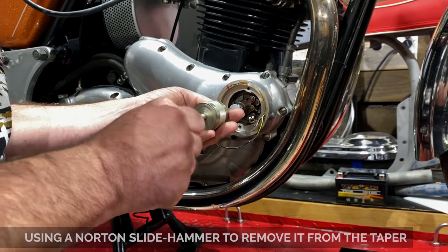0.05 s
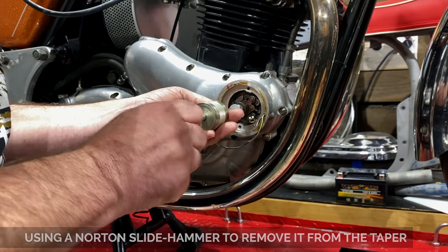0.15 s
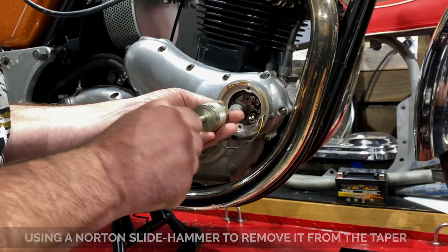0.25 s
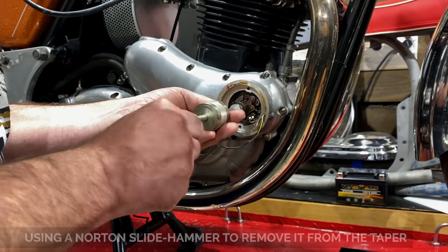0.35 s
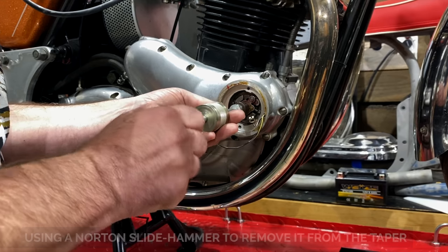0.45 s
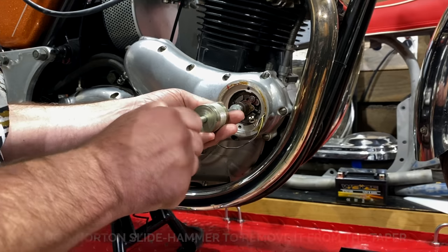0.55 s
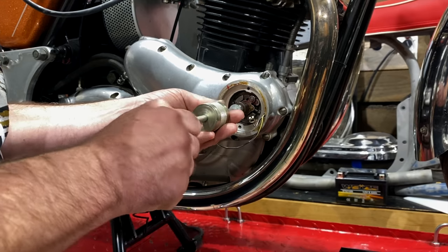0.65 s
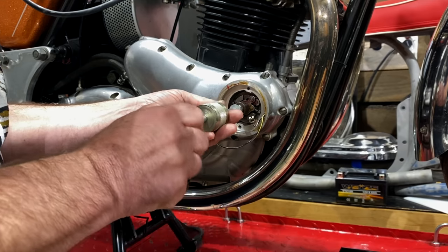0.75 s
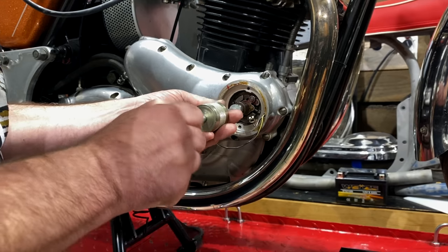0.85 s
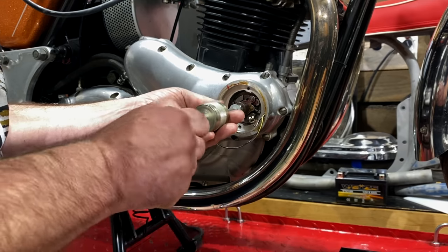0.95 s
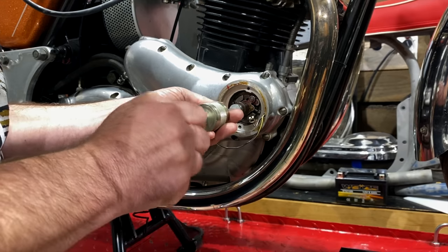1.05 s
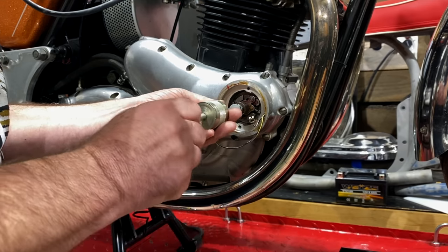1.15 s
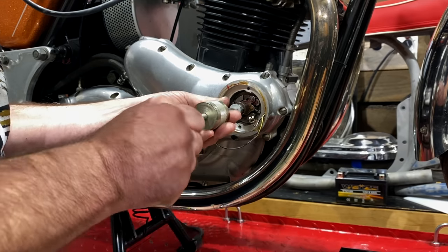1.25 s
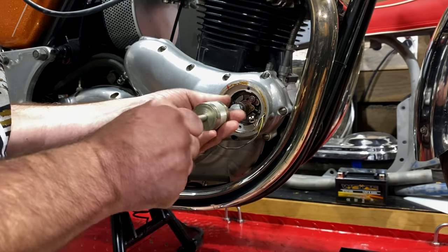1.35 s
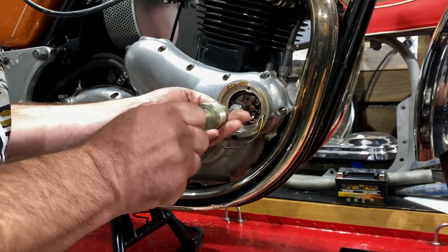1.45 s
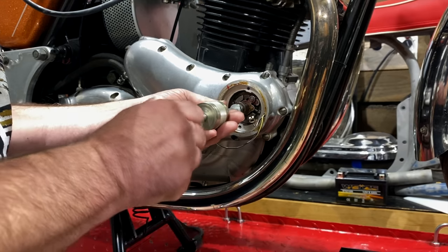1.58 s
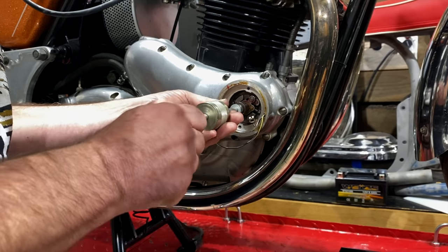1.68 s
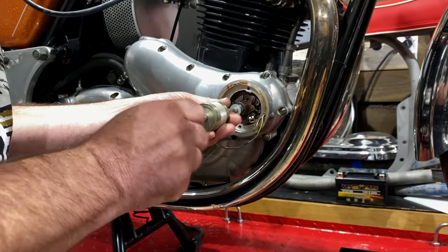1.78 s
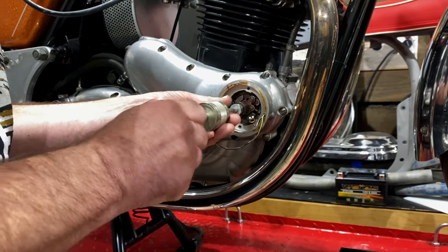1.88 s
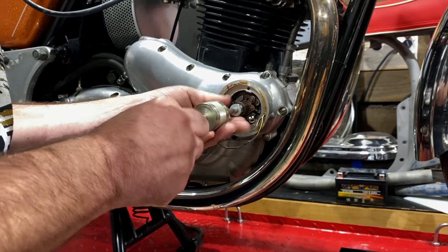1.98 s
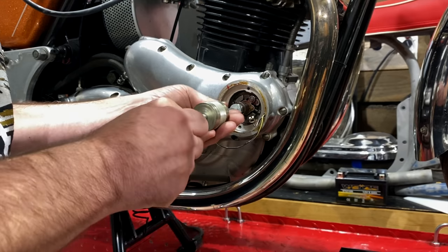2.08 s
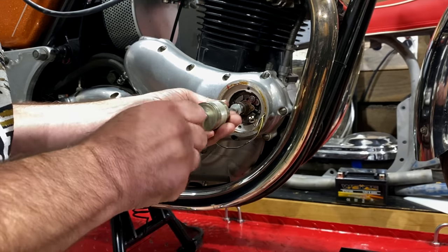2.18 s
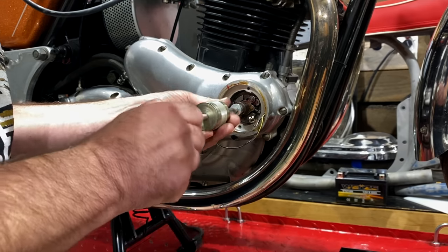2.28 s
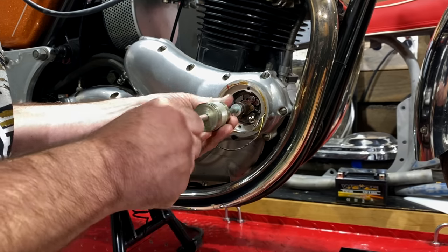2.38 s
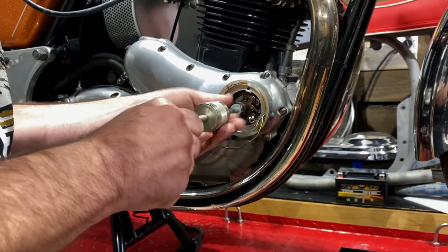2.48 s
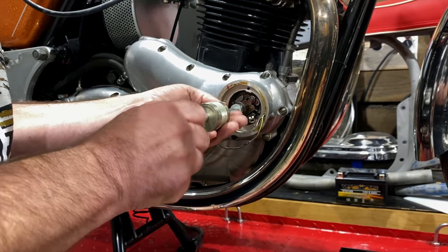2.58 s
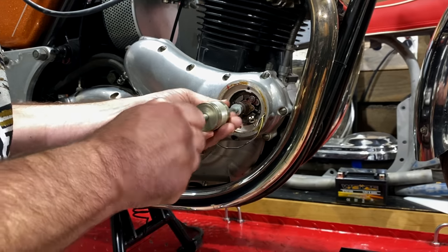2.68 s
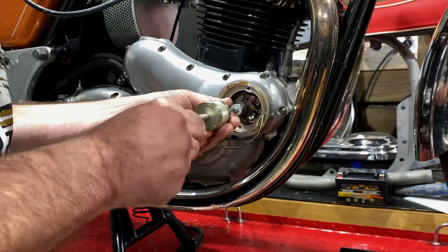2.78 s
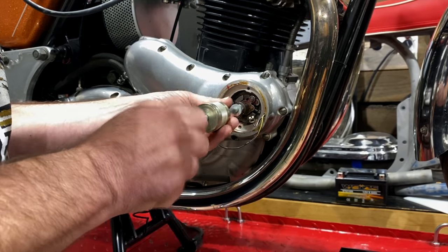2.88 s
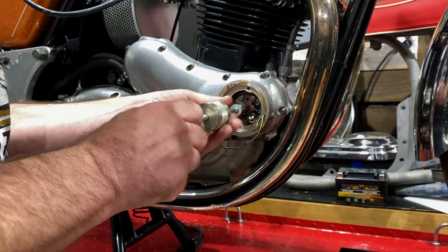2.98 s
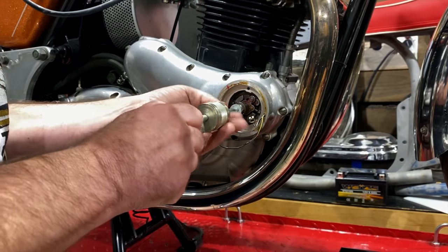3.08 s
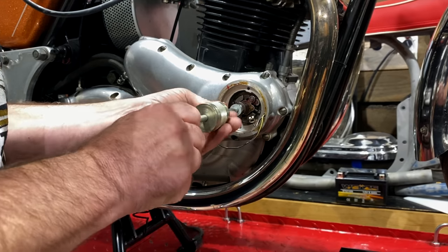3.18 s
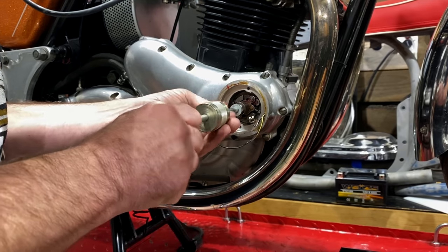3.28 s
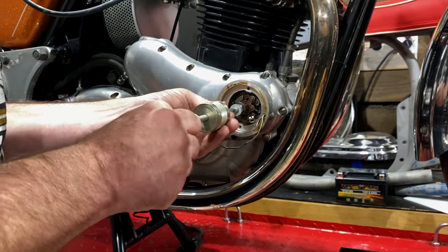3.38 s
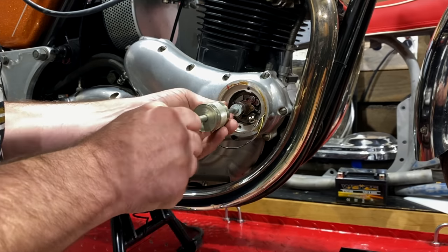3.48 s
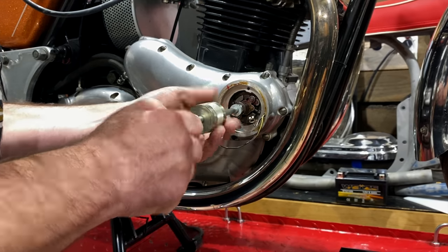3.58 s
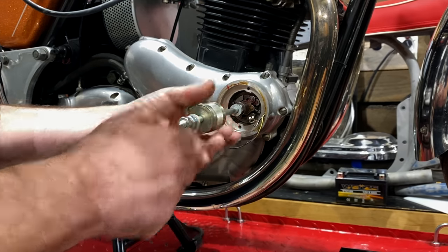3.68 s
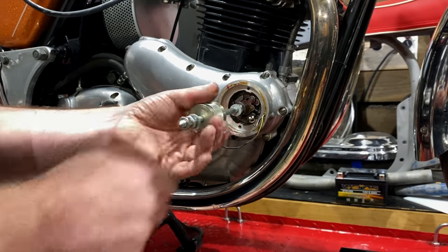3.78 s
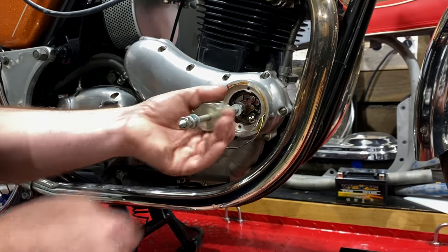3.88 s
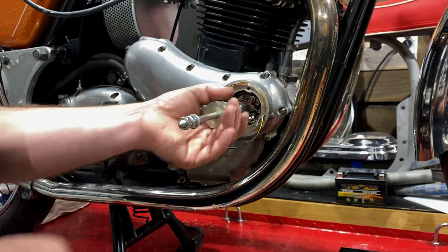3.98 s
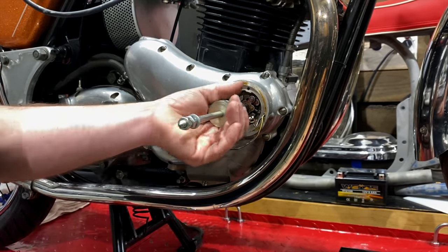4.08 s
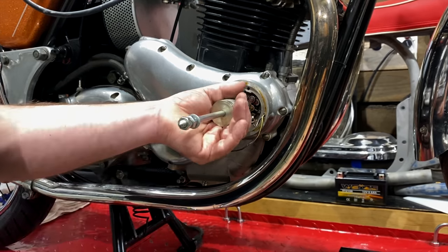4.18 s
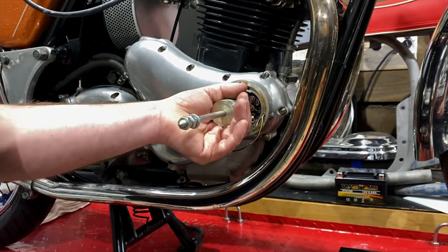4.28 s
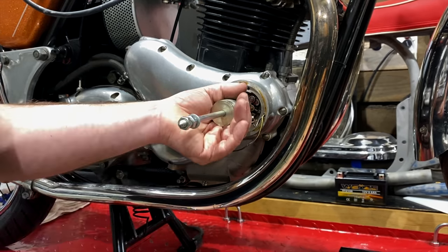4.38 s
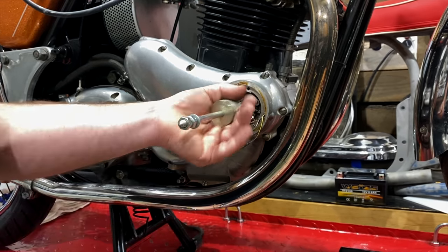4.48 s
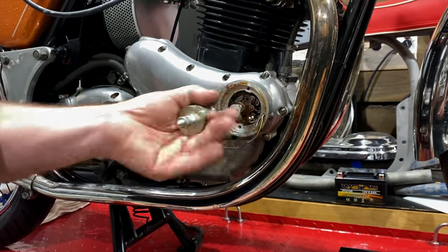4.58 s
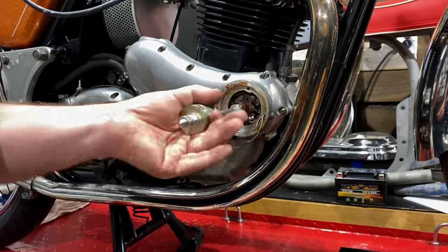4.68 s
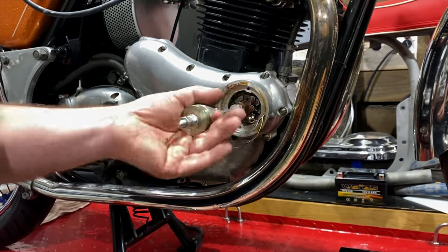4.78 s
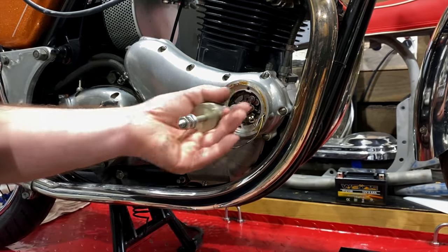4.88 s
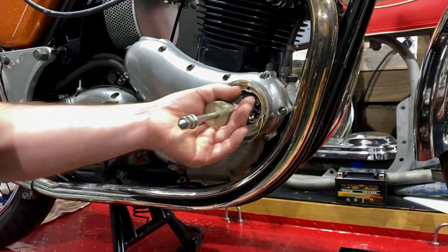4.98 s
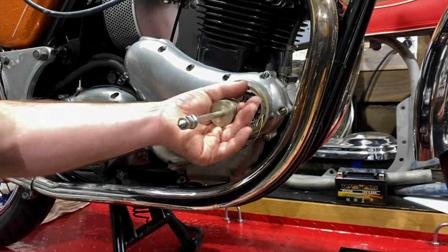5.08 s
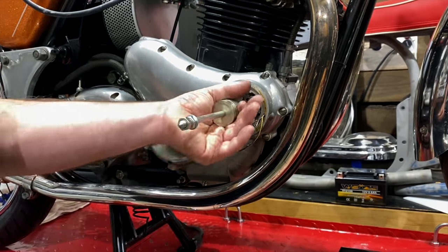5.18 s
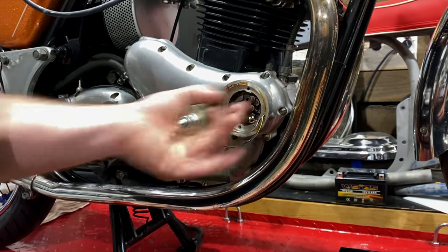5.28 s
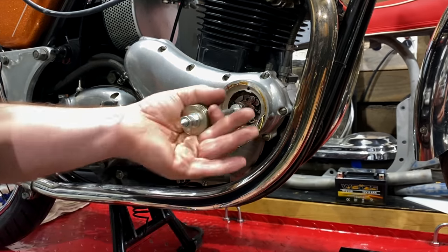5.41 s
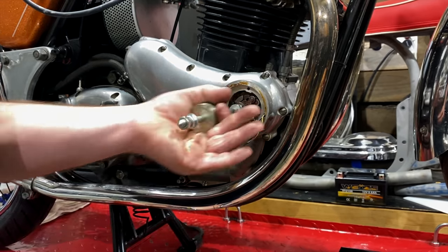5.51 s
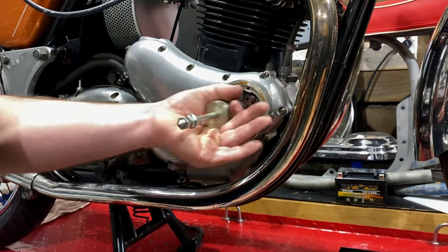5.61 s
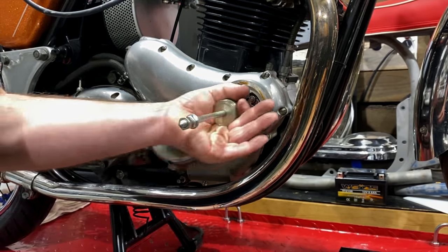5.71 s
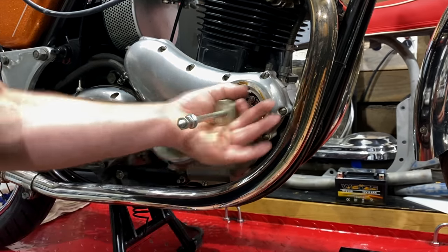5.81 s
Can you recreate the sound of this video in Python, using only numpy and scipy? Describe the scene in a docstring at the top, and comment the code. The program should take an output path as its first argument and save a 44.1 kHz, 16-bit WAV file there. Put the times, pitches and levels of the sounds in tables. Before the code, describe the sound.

A quiet workshop with low uneven rumble, faint mains hum and little hiss, in close stereo. From 0 to about 4 seconds a steel slide hammer is screwed into an engine part: irregular light clinks and ticks, several per second, each a tiny chatter with a short bright rod ring, among faint gritty thread scrapes. Contacts are somewhat firmer from 3 seconds. Around 4.3 to 4.7 the weight rubs more audibly along its rod, with a barely audible low moan. At 4.98 a scrape swells quickly into a very loud steel crack at 5.06, with a high whistle, engine-case ringing and a diffuse room tail. Scraping fades as the weight slides back from 5.16 to 5.65, with small clinks and two dull, soft brushes near 5.4 and 5.7. Another short rising scrape leads to a second, equally hard, drier slam at 5.78, its ringing cut off by the end.

```python
"""Slide hammer in a workshop

A slide hammer is screwed into an engine part: light chattering contacts clink and set its rod ringing,
amid thread scrapes of uneven noise. Twice the weight scrapes along the rod and slams into the stop: a noise
crack wakes ringing modes of the engine case and a diffuse room tail. A faint moan and two dull brushes join in.
Mains hum (sines) and a low rumble (filtered noise) lie underneath; the loudest peaks overload the recorder.
"""
import sys
import numpy as np
from scipy import signal
from scipy.fft import rfft, irfft
from scipy.io import wavfile
from scipy.ndimage import uniform_filter1d

SR = 44100
rng = np.random.default_rng(int(sys.argv[2]) if len(sys.argv) > 2 else 0)


def wav_record(signal):
    """Record a signal, one row per channel, as 16-bit PCM in the file named by sys.argv[1]."""
    frames = np.transpose(np.atleast_2d(signal))
    bounded = np.clip(frames, -1, 1)
    # unit amplitude maps onto the largest positive 16-bit level
    quanta = np.round(bounded * 32767).astype(np.int16)
    wavfile.write(sys.argv[1], SR, quanta)


N = 257984  # length in samples


def undb(db):
    """Decibels to gain."""
    return 10 ** (np.asarray(db) / 20)


def unit(x):
    """Scale to rms 1."""
    return x / np.sqrt(np.mean(x ** 2))


def over_hz(table, hz):
    """Read a table of (f/Hz, value) on a log frequency axis."""
    f, value = np.transpose(table)
    return np.interp(np.log(np.maximum(hz, 1)), np.log(f), value)


def colour(x, table):
    """Filter by a (f/Hz, level/dB) spectrum through a causal, minimum-phase response with energy 1."""
    log_gain = over_hz(table, np.linspace(0, SR / 2, 1025)) * np.log(10) / 20
    cepstrum = irfft(log_gain)
    # folding the cepstrum forward in time makes the response causal
    cepstrum[1:1024] *= 2
    cepstrum[1025:] = 0
    h = irfft(np.exp(rfft(cepstrum)))
    h = np.reshape(h / np.linalg.norm(h), (1,) * (x.ndim - 1) + (-1,))
    return signal.fftconvolve(x, h, axes=-1)[..., :x.shape[-1]]


def three(x, low_hz, high_hz):
    """Split into low, middle and treble with crossfades a third of an octave wide."""
    spec, f = rfft(x), np.linspace(1, SR / 2, N // 2 + 1)
    above_low, above_high = (np.clip(.5 + 3 * np.log2(f / hz), 0, 1) for hz in (low_hz, high_hz))
    return [irfft(spec * part, N) for part in (1 - above_low, above_low - above_high, above_high)]


# how alike the two ports sound: (f/Hz, left-right correlation)
PORT_LIKENESS = [(60, 0.78), (300, 0.6), (700, 0.12), (3000, 0.16), (8000, 0.043)]


def stereo(size):
    """White noise at two ports, most alike in the bass: shared and opposed noise mixed per frequency."""
    mid, side = rfft(rng.standard_normal((2, size)))
    alike = np.clip(over_hz(PORT_LIKENESS, np.linspace(0, SR / 2, len(mid))), 0, 1)
    shared, opposed = mid * np.sqrt(1 + alike), side * np.sqrt(1 - alike)
    return irfft([shared + opposed, shared - opposed], size) / np.sqrt(2)


def walk(rate):
    """Random levels held 1 / rate s and slewed twice; rms 1."""
    hold = int(SR / rate)
    steps = np.repeat(rng.standard_normal(N // hold + 1), hold)
    return unit(uniform_filter1d(uniform_filter1d(steps, hold), hold)[:N])


def curve(rows, hold_s=.008):
    """Columns of a table over time, and a soft gate for its span plus a short hold."""
    s, *columns = np.transpose(rows)
    t = np.arange(N) / SR
    gate = uniform_filter1d(1. * ((t > s[0]) & (t < s[-1] + hold_s)), 100)
    return gate, [np.interp(t, s, column) for column in columns]


def bursts(times, gains, taus, rise):
    """Sum of envelopes that swell to their gain and decay; the swell lasts a share of the decay."""
    env, t = np.zeros(N), np.arange(4000) / SR
    for s, gain, tau in zip(times, gains, np.maximum(taus, 3e-4)):
        start = int(s * SR)
        shape = (1 - np.exp(-t / (rise * tau))) ** 2 * np.exp(-t / tau)
        env[start:start + len(t)] += (gain * shape / shape.max())[:N - start]
    return env


def kicks(times, gains, scatter_db):
    """An impulse at each contact, of random phase and, with scatter, uneven size."""
    force, chance = np.zeros(N, complex), rng.standard_normal((len(times), 2))
    at = (np.asarray(times) * SR).astype(int)
    force[at] = gains * undb(scatter_db * chance[:, 0]) * np.exp(3j * chance[:, 1])
    return force


def ring(force, modes, flutter_db=2.0):
    """Decaying modes driven by a force; the right port hears each mode at another phase."""
    out = np.zeros((2, N))
    for hz, db, t60 in modes:
        pole = np.exp(2j * np.pi * hz / SR - np.log(1000) / (t60 * SR))
        z = signal.lfilter([1], [1, -pole], force(hz))
        turn = np.exp(1j * rng.normal(0, min(hz / 1500, 1.5)))
        # loose parts make each ring flutter
        out += undb(db + flutter_db * walk(70)) * np.imag([z, z * turn])
    return out


# reverberation of the room: (f/Hz, t60/s)
ROOM_DECAY = [(125, 0.7), (500, 0.75), (1500, 0.35), (4000, 0.33), (8000, 0.17), (14000, 0.44)]


def room(x, rise_s=0.00043):
    """Diffuse tail: octave bands of noise, each dying at its own rate."""
    t = np.arange(SR) / SR
    spec, f, h = rfft(stereo(SR)), np.linspace(1, SR / 2, SR // 2 + 1), 0
    for hz in 62.5 * 2. ** np.arange(9):
        band = irfft(spec * np.clip(1 - np.abs(np.log2(f / hz)), 0, 1), SR)
        h = h + band * undb(-60 * t / over_hz(ROOM_DECAY, hz))
    h = h * (1 - np.exp(-t / rise_s))
    return signal.fftconvolve(x[None], h / np.linalg.norm(h[0]), axes=-1)[:, :N]


# spectrum of the workshop air: (f/Hz, relative level/dB)
SHOP_SPECTRUM = [(15, -34.5), (25, -17), (74, 4), (309, -18), (666, -22.5), (1160, -26.5), (1600, -35),
                 (1920, -32.5), (2440, -34), (6850, -35.5), (8470, -50), (9920, -38), (11600, -49),
                 (14000, -72)]
# uneven drift in the level of the low rumble, played relative to its mean: (t/s, level/dB)
RUMBLE_DRIFT = [(0.0, -52.5), (1.25, -59), (1.32, -53.5), (1.83, -57), (2.09, -50), (2.26, -56.5),
                (3.6, -53.5), (3.73, -52), (3.94, -57.5), (4.09, -45.5), (4.15, -58.5), (4.25, -51.5),
                (4.94, -56.5), (5.05, -54.5)]
# mains hum partials before the drift: (f/Hz, level/dB)
HUM_PARTIALS = [(59.5, -63), (119, -64), (178.5, -72), (238, -73)]
SHOP_DB = -57  # rms of rumble and hiss before the port balance


def shop():
    """Rumble of uneven, drifting level, faint hiss above it, and wavering mains hum that follows the drift."""
    low, mid, high = three(colour(stereo(N), SHOP_SPECTRUM), low_hz=198, high_hz=1000)
    drift_db = curve(RUMBLE_DRIFT)[1][0]
    drift = undb(drift_db - np.mean(drift_db))
    air = unit(drift * low + mid + high) * undb(SHOP_DB)
    t = np.arange(N) / SR
    hum = sum(undb(db + 2 * walk(1.2)) * np.sin(2 * np.pi * hz * t) for hz, db in HUM_PARTIALS)
    return (air + drift * hum) * undb([[-.8], [.8]])  # right port louder


# clinks of weight and thread; the shares are 0 for a usual clink:
# (t/s, level/dB, depth share/dB, brightness share/dB, contact chatter/s, main ring share near 1.6 kHz/dB)
CLINK_CONTACTS = [(0.0034, -48.5, 4.5, 6.5, 0.003, 2), (0.012, -47, 4.5, 0.5, 0.0032, 4.5),
                  (0.2574, -68, -8, -8, 0.0028, -4), (0.3278, -63, 7, -29, 0.006, 10),
                  (0.391, -52.5, 10, -6, 0.008, 8), (0.4127, -59.5, 4, -29, 0.0062, 6),
                  (0.434, -52, -13, -4, 0.0032, 6.5), (0.5012, -58.5, -17, 5.5, 0.0032, -3),
                  (0.549, -66.5, -3, 13, 0.0038, -2), (0.5702, -56, -13, 10, 0.003, -4),
                  (0.597, -78, 5, 28, 0.0058, -4), (0.7199, -55, 5, -1, 0.0089, 7),
                  (0.8999, -59, -5, -1, 0.005, -2), (0.9572, -61, 8.5, -10, 0.0065, 6),
                  (1.0012, -45, 2, -12, 0.0029, 0), (1.059, -48, -2, 18, 0.003, -3.5),
                  (1.0977, -65, 15, 22, 0.0029, 2), (1.2017, -60, -2, -9, 0.0034, -5),
                  (1.269, -48.5, 3, -8, 0.0032, -1), (1.3691, -52, 2, -19, 0.0057, -0.5),
                  (1.4399, -55.5, 6, -19, 0.0081, 4), (1.498, -59.5, 6, 6.5, 0.003, -3.5),
                  (1.5461, -58, 7, 16, 0.0034, -1), (1.59, -58.5, -3, 10, 0.0033, 0),
                  (1.633, -48.5, 1, -20, 0.0031, 0), (1.6794, -61, 9, 8, 0.0029, 0),
                  (1.708, -53.5, 7.5, 4.5, 0.0055, 4), (1.922, -51, 7.5, -8, 0.0069, -1),
                  (2.0035, -47.5, 3, -11, 0.0032, 0.5), (2.0488, -51.5, -1, 11, 0.0033, -0.5),
                  (2.1958, -59.5, -2, 14.5, 0.0027, -3), (2.2208, -55.5, 0.5, 15.5, 0.0028, -2),
                  (2.2607, -58.5, -2, 17.5, 0.0031, -5), (2.2873, -62.5, -18, 18.5, 0.0034, -9),
                  (2.3751, -43.5, -5, 1, 0.0029, -7), (2.61, -50.5, 0, 8.5, 0.0049, 3),
                  (2.6503, -59.5, 9, 14, 0.0033, 0), (2.764, -69, -1, 23, 0.0034, -3),
                  (2.7842, -53, -9, 1, 0.0032, 2.5), (3.0019, -41.5, 0.5, -1.5, 0.0032, 2),
                  (3.0226, -50.5, 9, 8, 0.0029, -5), (3.0899, -49, 1.5, -8, 0.003, 0),
                  (3.127, -46.5, 1, -3, 0.0031, -1.5), (3.3068, -49.5, -3, -4, 0.005, -1.5),
                  (3.3364, -60.5, -6, 16.5, 0.003, -2), (3.4152, -56.5, -14, 10.5, 0.0027, -2),
                  (3.4689, -46, 1.5, -14, 0.0032, -0.5), (3.5138, -40.5, -4.5, 3, 0.0028, -0.5),
                  (3.6148, -46.5, -9, -4, 0.0031, 0), (3.7747, -52, -4.5, -28, 0.003, 2),
                  (4.0312, -55, 4.5, 14.5, 0.0026, -1), (4.0986, -54.5, 2, 6.5, 0.0029, 6.5),
                  (4.2557, -43.5, -1.5, -7, 0.0028, -8), (4.3185, -41, 7, 3.5, 0.003, 0.5),
                  (4.442, -55.5, 10, -4, 0.0027, 2.5), (4.516, -53, 11, 8.5, 0.0031, 4),
                  (4.6475, -63, -2, 10, 0.0031, 6), (4.9609, -45, 7, 6.5, 0.0037, -6),
                  (5.3788, -47.5, 5.5, 4, 0.0032, 0), (5.5143, -54, 14, -13, 0.0027, 4),
                  (5.5957, -60, 15.5, 5, 0.0025, 1.5), (5.7137, -47, 3, -1, 0.003, -3)]
# spectrum of a contact: (f/Hz, relative level/dB)
CLINK_SPECTRUM = [(240, -43), (400, -30.5), (1620, -4), (1900, -12), (2470, -6), (3400, -14.5),
                  (9160, -32.5), (13000, -50)]
# modes of rod and weight, also rung by the scrapes: (f/Hz, relative level/dB, t60/s)
ROD_MODES = [(800, -13, .1), (1227, -10, .1), (1389, -12, .15), (1480, -11, .15), (1610, -1, .19),
             (1752, -7, .24), (2003, -14, .3), (2175, -12, .19), (2422, -8, .16), (2622, -10, .15),
             (2885, -14, .15), (3045, -12, .1), (4237, -16, .08), (4500, -18, .15), (5010, -14, .15),
             (5300, -21, .15), (6300, -22, .1), (9400, -24, .06)]
LOW_DB, TREBLE_DB, SNAP_DB, RING_DB = 2.5, 3.5, 12.5, -6.5  # shares in a usual clink
BOUNCE_DB = 2.5  # lost in each chatter time
TREBLE_FOLLOWS = 0.33  # dB of treble for each dB of brightness; the snap follows in full


def clinks():
    """Light contacts: a short chatter, the rod ringing after it, and the room."""
    s, db, depth_db, bright_db, tau, ring_db = np.transpose(CLINK_CONTACTS)
    shares_db = (LOW_DB + depth_db, 0, TREBLE_DB + TREBLE_FOLLOWS * bright_db, SNAP_DB + bright_db)
    gains = [undb(db + share) for share in shares_db]
    low, mid, high = three(colour(rng.standard_normal(N), CLINK_SPECTRUM), 1200, 3500)
    low_env, mid_env, high_env = [bursts(s, gain, tau, rise=0.42) for gain in gains[:3]]
    tick = low * low_env + mid * mid_env + three(high, 3500, 7800)[1] * high_env
    # the thread's tiny edges snap: short, bright and hardly echoed
    snap = three(high, 5680, 12900)[1] * bursts(s, gains[3], 0.57 * tau, rise=.6)

    def chatter(hz):
        """Three contacts, weaker on average each time, so the ring swells in."""
        band = (hz > 1200) + (hz > 3500)  # low, middle or treble gain
        gain = gains[band] * undb(ring_db * (1350 < hz < 1800))
        return sum(kicks(s + k * tau, gain * undb(RING_DB - BOUNCE_DB * k), scatter_db=2.5)
                   for k in (.5, 2, 4))

    rod = ring(chatter, ROD_MODES, flutter_db=5.5)
    direct = undb(-1.5) * tick + undb(5.5) * snap + undb(1) * rod
    return direct + room(undb(4.0) * tick + undb(-4.5) * snap + rod[0])


# scrapes of the thread and of the weight along the rod, swelling or fading:
# (start t/s, end t/s, start level/dB, end level/dB, treble share/dB)
SCRAPES = [(0.36, 0.399, -77, -59.5, 1), (0.704, 0.7, -83, -51.5, -3), (0.388, 0.425, -61, -71, 4),
           (0.472, 0.535, -64, -66, -1), (0.727, 0.77, -63, -72, 6), (1.06, 1.125, -60, -68, 1),
           (1.688, 1.756, -61, -73, 2), (2.225, 2.31, -60, -64, 5), (3.994, 4.044, -69, -51.5, -14),
           (4.334, 4.495, -47.5, -55, -2.5), (4.513, 4.63, -43, -73, -0.5), (4.641, 4.703, -53.5, -75, 2),
           (4.979, 5.001, -43, -28.5, -1), (5.011, 5.063, -29, -18.5, 0.5), (5.161, 5.43, -36.5, -55, -2.5),
           (5.443, 5.507, -55.5, -43.5, -5.5), (5.512, 5.659, -51.5, -71, -4.5),
           (5.718, 5.735, -44.5, -33, -1), (5.74, 5.772, -31.5, -19, 2.5)]
# spectrum of a scrape: (f/Hz, relative level/dB)
SCRAPE_SPECTRUM = [(240, -45.5), (400, -9), (1150, -1.5), (1610, 4), (3320, 4.5), (3470, 0.5), (5680, 8),
                   (8170, -7), (11700, -7.5), (12800, -23.5), (16600, -48.5), (22000, -120)]


def scrapes():
    """Rough rubbing contact: noise of dense uneven slips that also keep the rod singing."""
    level, treble = np.zeros(N), np.zeros(N)
    for start, end, start_db, end_db, treble_db in SCRAPES:
        gate, (db,) = curve([(start, start_db), (end, end_db)])
        level += gate * undb(db)
        treble += gate * undb(db + treble_db)
    grit = unit(undb(3.0 * walk(400) + 2.04 * walk(60)))
    low, mid, high = three(colour(stereo(N), SCRAPE_SPECTRUM), 1200, 5000)
    rub = grit * ((low + mid) * level + high * treble)

    def slips(hz):
        """Fine slips wake the upper modes most."""
        return (min(hz, 5200) / 2500) ** 2 * level * grit * rng.standard_normal(N)

    rod = ring(slips, ROD_MODES)
    return undb(-5) * rub + undb(-32.5) * rod + undb(-4.5) * room(rub[0])


MOAN_START_S, MOAN_END_S, MOAN_HZ = 4.39, 4.735, 372
MOAN_DB = -72.5  # rms, before the wavering


def moan():
    """A faint low sine of wavering level while the weight glides back."""
    gate = curve([(MOAN_START_S, 0), (MOAN_END_S, 0)])[0]
    tone = np.sqrt(2) * np.sin(2 * np.pi * MOAN_HZ * np.arange(N) / SR)
    return gate * undb(MOAN_DB + 4 * walk(15)) * tone


# weight hitting the stop: (t/s, level/dB, crack decay/s, tail share/dB, share of the top whistle/dB,
# share of the 6 kHz ping/dB, left minus right/dB)
STOP_BLOWS = [(5.0648, -10, 0.004, 1.5, 13.5, -5, 1), (5.7819, -8, 0.0037, -4, -26, -2, 1)]
# spectrum of the crack: (f/Hz, relative level/dB)
CRACK_SPECTRUM = [(35, -45), (60, -9), (478, 5), (1030, -3), (2680, 5), (3390, -9.5), (5650, -3), (6350, 9),
                  (8400, -7), (10600, 1.5), (12200, -13), (13400, -33), (15800, -39.5)]
# modes of engine case and frame, woken by the hard blows: (f/Hz, relative level/dB, t60/s)
CASE_MODES = [(178, -23, .9), (400, -2, .06), (745, -6, .2), (943, -8, .3), (1003, -5, .35),
              (1125, -8, .25), (1350, -12, .4), (1507, -10, .3), (2003, -9, .8), (2180, -18, .6),
              (2420, -11, .15), (2630, -6, .22), (4350, -12, .15), (4500, -12, .2), (5290, -14, .25),
              (6355, -5, .2), (10300, -20, .2), (15305, -13, .17)]
# spectrum of the clang sent to the room: (f/Hz, relative level/dB)
CLANG_SPECTRUM = [(59, -71), (100, -30), (173, -14.5), (212, -29.5), (367, -19.5), (497, -18), (539, -20),
                  (878, -7), (1010, -1.5), (4020, -11), (6550, -8), (12800, -21.5), (16600, -65),
                  (22000, -120)]


def blows():
    """Steel on steel: a crack, then case and room ring out."""
    out = 0
    for s, db, tau, tail_db, whistle_db, ping_db, pan_db in STOP_BLOWS:
        env, noise = bursts([s], [undb(db)], [tau], rise=0.15), rng.standard_normal(N)
        # above the bass the two ports also hear noise of their own
        apart = three(colour(env * rng.standard_normal((2, N)), CRACK_SPECTRUM), 200, 600)[2]
        crack = colour(env * noise, CRACK_SPECTRUM) + .5 * apart

        def strike(hz):
            """One kick, with its own strength for whistle and ping."""
            strength_db = db + whistle_db * (hz > 12000) + ping_db * (6000 < hz < 7000)
            return kicks([s + .002], undb(strength_db), scatter_db=0.0)

        case = ring(strike, CASE_MODES)
        tail = undb(tail_db) * room(colour(env * noise, CLANG_SPECTRUM))
        pan = undb([[pan_db / 2], [-pan_db / 2]])
        out = out + pan * (undb(8.5) * crack + undb(-14.5) * case + tail)
    return out


# dull low brushes as the hand swings: (middle t/s, half length/s, level/dB)
HAND_SWINGS = [(5.387, 0.036, -62.5), (5.685, 0.027, -49)]


def swing():
    """Low noise that swells and flutters as the hand comes past."""
    t = np.arange(N) / SR
    env = sum(undb(db) * np.exp(-((t - s) / half_s) ** 2) for s, half_s, db in HAND_SWINGS)
    band = signal.butter(2, [220, 480], "band", fs=SR, output="sos")
    puff = signal.sosfilt(band, stereo(N))
    return env * undb(3.5 * walk(90)) * unit(puff)


LAG = 3  # samples the right port hears later


def scene():
    """All sources; the right port hears them a moment later."""
    left, right = shop() + clinks() + scrapes() + moan() + blows() + swing()
    return np.array([left, np.roll(right, LAG)])


TOP_HZ = 15900


def record(dry):
    """Overload squeezes the peaks smoothly, then a steep low-pass cuts the top."""
    cut = signal.ellip(8, .2, 70, TOP_HZ, fs=SR, output="sos")
    return signal.sosfilt(cut, 0.95 * np.tanh(1.204 * dry))


dry = scene()
out = record(dry)
wav_record(out)
```